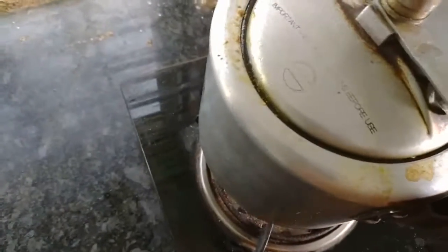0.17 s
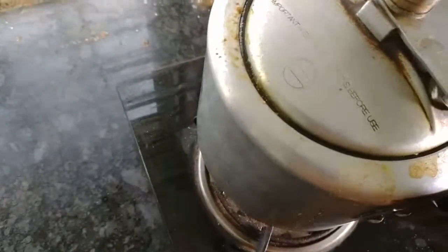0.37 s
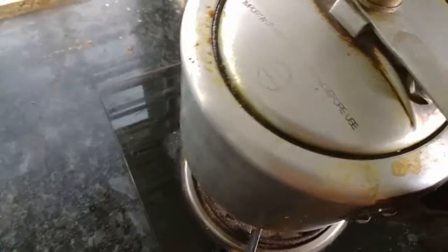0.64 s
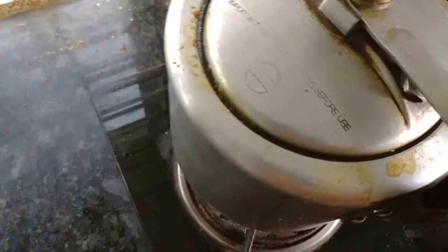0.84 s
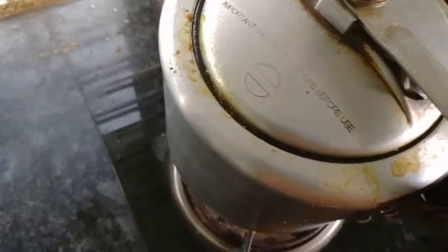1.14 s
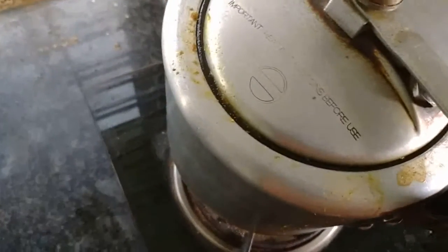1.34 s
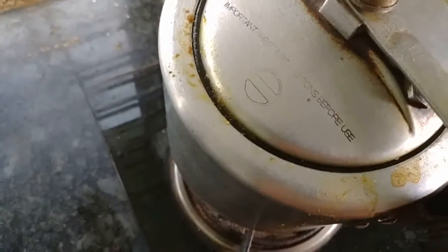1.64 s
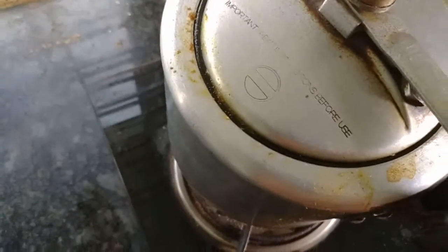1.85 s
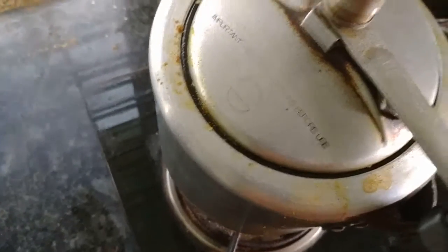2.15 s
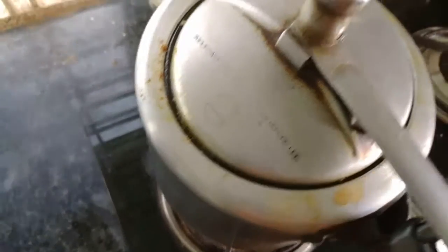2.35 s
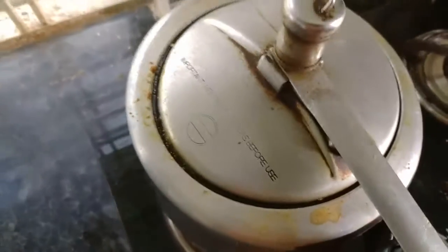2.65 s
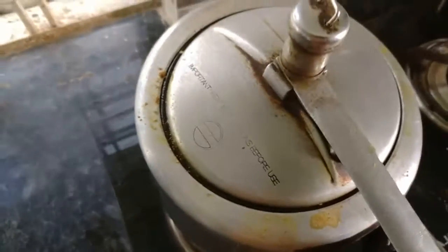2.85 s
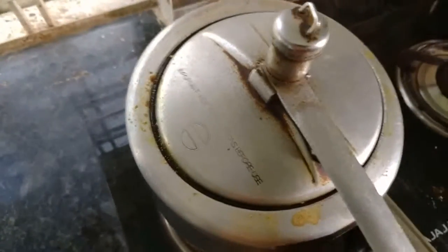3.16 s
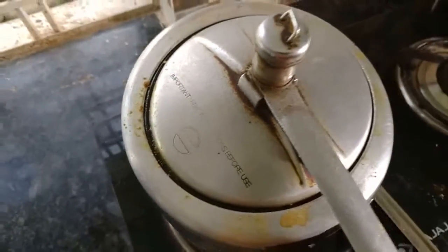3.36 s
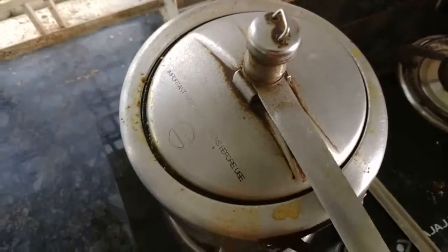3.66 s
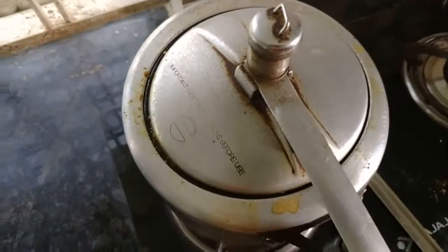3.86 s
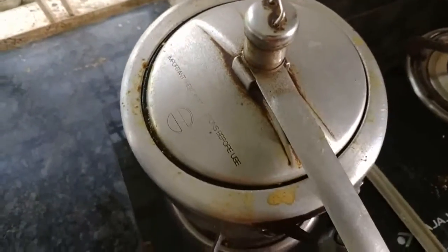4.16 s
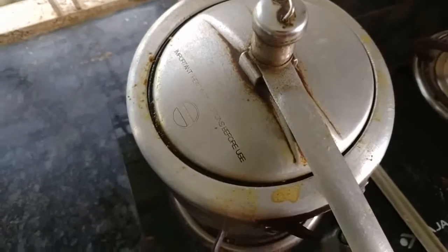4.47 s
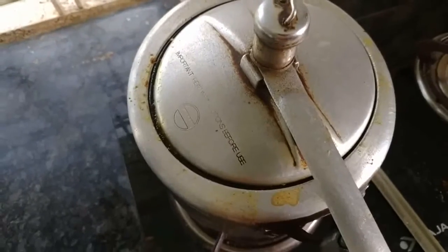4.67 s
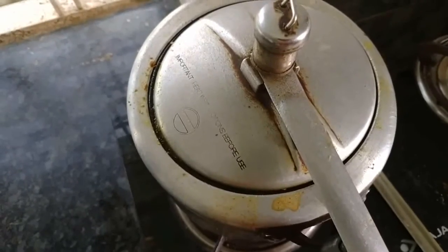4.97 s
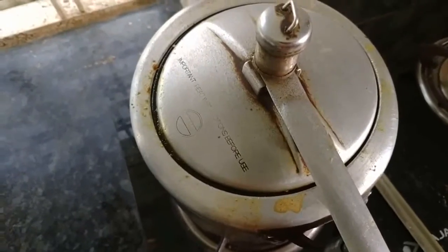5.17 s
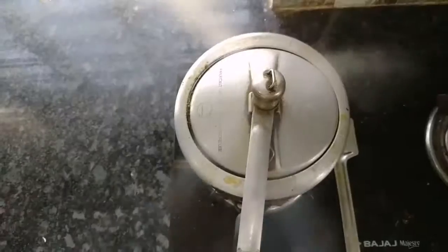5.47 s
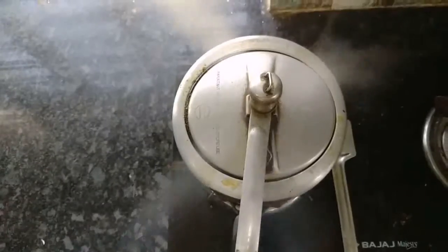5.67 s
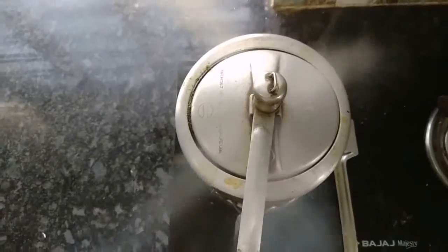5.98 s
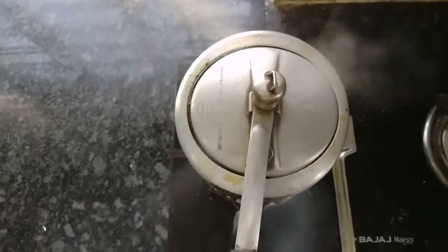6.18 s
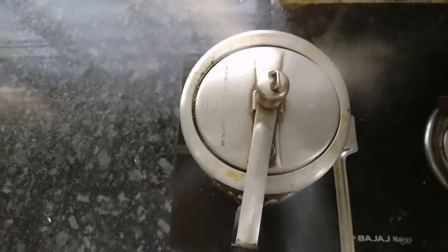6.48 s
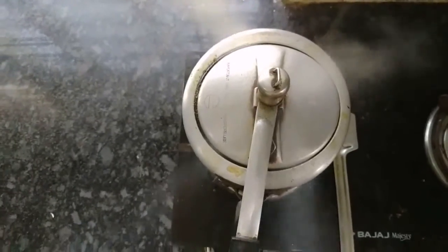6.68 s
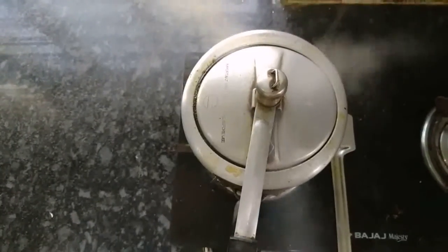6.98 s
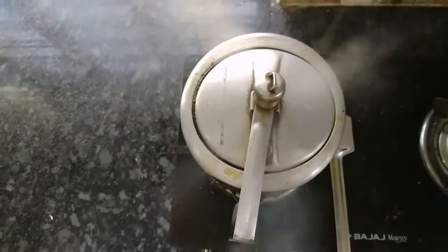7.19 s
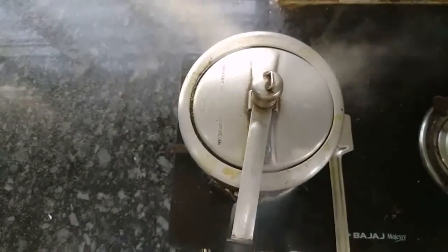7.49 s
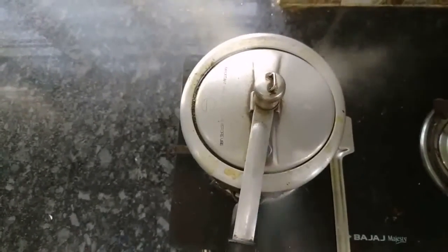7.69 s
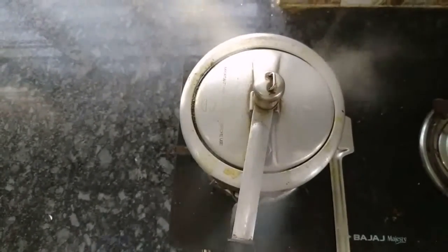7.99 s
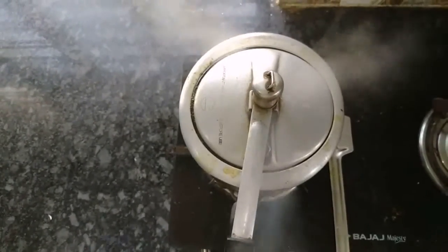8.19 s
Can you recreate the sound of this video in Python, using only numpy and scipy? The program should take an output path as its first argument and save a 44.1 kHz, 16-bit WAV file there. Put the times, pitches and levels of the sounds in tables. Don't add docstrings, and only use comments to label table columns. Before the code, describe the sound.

For the first five seconds a kitchen murmurs softly, with airy hiss, muffled low fan drones and a thin, pulsing hob whine near 10 kHz, stronger on the left. A faint husky falling bird whistle repeats about every 0.9 seconds from 0.15. Small scrapes come at the start, 0.7 and 1.0, a bright scratch at 2.35, a soft drag at 2.6 and a tiny one at 3.5. Sharp, dry counter knocks hit at 0.8, 1.75, 2.4 (brightest), 3.5 and, more softly, 3.7, with faint taps between. Thin metal jingles at 3.9-4.25, leaning left, with short room echo. A near-quiet second follows. At 5.27 the valve opens almost instantly: a loud, broad, bright steam hiss, strongest around 8-9 kHz, with draught buffeting on the left. It starts rougher, settles slightly as the phone pulls back, and continues steadily until cut at 8.3.

```python
import sys
import numpy as np
from scipy import signal
from scipy.fft import rfft, irfft, next_fast_len
from scipy.io import wavfile
from scipy.ndimage import uniform_filter1d

SR = 44100
rng = np.random.default_rng(int(sys.argv[2]) if len(sys.argv) > 2 else 0)


def gain_from_db(level_db):
    decades = np.asarray(level_db, float) / 20
    return 10 ** decades


def store_pcm(level_fs):
    pcm = np.round(np.clip(level_fs, -1, 1) * 32767).astype(np.int16)
    wavfile.write(sys.argv[1], SR, np.atleast_2d(pcm).T)


N = 367379

# pitch_hz, level_db (per Hz)
AIR_COLOUR = [(30, -40), (60, -13), (100, -7.5), (200, -4), (290, -7.5), (370, -2), (450, -6), (520, -1),
              (1050, -6), (2500, -10), (5500, -16), (9400, -20.5)]
# pitch_hz, level_db
AIR_TREBLE = [(9400, 0), (10550, 0), (10800, -32), (11800, -30), (12300, -21), (14200, -20), (14300, -30)]
# pitch_hz, likeness (-1 to 1)
AIR_LIKENESS = [(60, 0.81), (150, 0.96), (380, 0.8), (950, 0.036), (2380, 0.023), (5970, -0.15),
                (15000, 0.85)]
# pitch_hz, left_minus_right_db
AIR_LEAN = [(60, -8.5), (130, 8), (290, 11.5), (640, 1.5), (1410, 1), (3090, 0.5), (6810, -1), (15000, 46)]
# centre_s, rise_db, length_s
STIRRINGS = [(.14, 4, .12), (.9, 2, 0.22), (1.82, 8.5, 0.23), (2.54, 3, .1), (3.2, 2, 0.28),
             (3.72, 9.5, 0.29), (4.3, 3, 0.4), (5.1, 2.5, 0.36)]
# pitch_hz, width_hz, level_db
FAN_DRONES = [(111.8, 13, -69.5), (70.4, 14, -80), (368.4, 45, -71.5), (275.4, 34, -71.5)]
# multiple (times 100.02 Hz), level_db
WHINE_PARTIALS = [(98, -72), (99, -69), (99.5, -81), (100, -59), (100.5, -80), (101, -58.5), (102, -69),
                  (103, -79)]
# start_s, length_s, peak_db, brightness_db, peak_place (0 to 1)
SCRAPES = [
    (0.014, .13, -49, -5, .15),
    (1.001, 0.17, -66, -1, .5),
    (0.734, 0.044, -50.5, 2, 0.4),
    (2.35, 0.048, -41, 14, 0.24),
    (2.578, .18, -62, 4, 0.48),
    (3.472, .03, -49.5, 6, 0.8),
]
# pitch_hz, width_hz, level_db
HOLLOW_BODY = [(375, 33, -2), (522, 70, 3), (824, 110, -2.5), (1080, 390, -16), (2200, 1500, -28)]
# start_s, level_db, stretch (times)
BIRD_CALLS = [(.155, -75, 1), (1.01, -76, 1), (1.901, -74, 0.92), (2.86, -71.5, 0.9), (3.761, -72, 1),
              (4.66, -71.5, 1)]
# start_s, peak_db, left_minus_right_db, brightness_db
COUNTER_KNOCKS = [
    (0.768, -19.5, 3, 0.5),
    (0.949, -48, 1.5, 7),
    (1.322, -43, 2.0, 9),
    (1.749, -14.5, 0, 2),
    (2.027, -48, 0, -2),
    (2.074, -46, -2, -12),
    (2.391, -13, 1, 11.5),
    (3.253, -42, -3, -14),
    (3.506, -13, -1, 3.5),
    (3.666, -23.5, 4, 0),
]
# pitch_hz, level_db, fall_by_60_db_s
COUNTER_MODES = [(563, -20, .025), (1036, 7.5, 0.012), (1466, 0, 0.0086), (1945, -0.5, 0.011),
                 (2690, 2.5, 0.0061), (3660, 0.5, 0.018), (4300, -3.5, 0.0056), (6230, -8, 0.0044),
                 (7600, -8, 0.011), (9720, -12, 0.01)]
# start_s, peak_db, left_minus_right_db, thud_db, ring_db
METAL_TOUCHES = [(2.6394, -50, 13, 11, -6), (2.8604, -48, 3, 20, 0), (3.921, -31, 5.5, -4, 3),
                 (3.9303, -26, 11, -3, 0), (3.9361, -29.5, 8, 2, 8), (3.9516, -23, 6, 2, 2),
                 (3.961, -36, 3, 0, -5), (3.973, -43, 3, -2, -2), (4.0936, -36, 15, -2, -6),
                 (4.0965, -42, 9.0, -2, 0), (4.117, -33.5, 7, 3, 5.5), (4.2455, -33, 6, -4, -4)]
# pitch_hz, level_db, fall_by_60_db_s
METAL_MODES = [(2480, -14, .05), (4750, -18, .03), (6950, -18, .12), (7500, -8, .22), (8710, -8, .08),
               (9520, -4, .1), (10160, -4, .1), (11500, -12, .05), (13150, -6, .15), (14200, -2, .14)]
# pitch_hz, level_db (per Hz)
JET_COLOUR = [(60, -64), (110, -13), (300, -24.5), (700, -15.5), (1500, -13.5), (3200, -9), (4600, -7),
              (6400, -8), (7500, -6), (8500, 1), (9500, -3.5), (10700, -9.5), (12000, -8.5), (14000, -13.5)]
# pitch_hz, level_db
JET_LEFT_COLOUR = [(2000, 3.5), (5000, -0.5), (7000, -2.5), (8400, -5), (9700, 3), (11000, 3.5),
                   (14000, 3.5)]
# pitch_hz, likeness (-1 to 1)
JET_LIKENESS = [(60, -0.07), (150, -0.01), (380, -0.069), (950, -0.23), (2380, 0.059), (5970, 0.26),
                (15000, -0.054)]
# pitch_hz, level_db (per Hz)
BUFFET_COLOUR = [(30, -39), (60, -36), (110, 9), (200, -2), (380, -1), (700, -3), (1500, -7), (3000, -12.5),
                 (6000, -18)]
# time_s, level_db
DRAUGHT_LEVEL = [(5.29, -27), (6.1, -24), (6.8, -26), (7.5, -27), (8.33, -28)]
# pitch_hz, fall_by_60_db_s
ROOM_DECAY = [(250, 0.41), (700, 0.27), (2000, 0.24), (4000, 0.31), (8000, 0.38), (14000, 0.15)]
# pitch_hz, level_db
PORT_COLOUR = [(25, -28), (60, -0.5), (4680, 0.5), (4800, -3), (5100, -4), (5600, -2), (6100, -0.5)]
# pitch_hz, level_db
RIGHT_BASS_CUT = [(60, -29), (300, -23), (400, -13), (480, 1)]
# pitch_hz, level_db
TOP_EDGE = [(14230, 0), (14300, -18), (14430, -18), (14520, -50), (15500, -54), (15800, -80)]
# pitch_hz, level_db
SILENT_BELOW = [(1200, -30), (1900, -7), (3000, -3.5), (4600, -3), (4820, -4), (4880, -.5), (5060, -.5),
                (5200, -8), (6300, -6), (8000, -8), (11000, -12), (12500, -12.5), (13600, -11), (14250, -8),
                (14300, -60)]


def evened(x):
    return x / np.sqrt(np.mean(x ** 2) + 1e-20)


def read(points, hz):
    f, value = np.transpose(points)
    return np.interp(np.log(hz + 1), np.log(f + 1), value)


def sides(pan_db):
    return gain_from_db(np.array([[pan_db / 2], [-pan_db / 2]]))


def add(mix, start_s, sound):
    part = mix[:, round(start_s * SR):][:, :sound.shape[1]]
    part += sound[:, :part.shape[1]]


def drift(count, shape=()):
    coarse = signal.resample(rng.standard_normal((*shape, count)), 4096, axis=-1)
    place = np.linspace(0, 4095, N)
    return np.apply_along_axis(lambda v: np.interp(place, np.arange(4096), v), -1, coarse)


def resonate(x, hz, width):
    r = np.exp(-np.pi * width / SR)
    return 2 * signal.lfilter([1 - r], [1, -r * np.exp(2j * np.pi * hz / SR)], x).real


def noise(field_db, likeness, patchy_db, flicker_db, size=1024, skip=0):
    hop = size // 4
    hz = np.fft.rfftfreq(size, 1 / SR)[:, None]
    t = (skip + np.arange((N - skip) // hop + 5) * hop) / SR
    a, b, c, d, patches = rng.standard_normal((len(t), len(hz), 5)).T
    patches = uniform_filter1d(patches, size=size // 80, axis=0)
    patches = evened(uniform_filter1d(patches, size=8, axis=1))
    flicker = evened(uniform_filter1d(rng.standard_normal(len(t)), size=3))
    same = np.clip(read(likeness, hz), -1, 1)
    left = a + 1j * b
    right = same * left + np.sqrt(1 - same ** 2) * (c + 1j * d)
    level_db = field_db(hz, t) + patchy_db * patches + flicker_db * flicker
    z = np.array([left, right]) * gain_from_db(level_db)
    out = evened(signal.istft(z, nperseg=size, noverlap=size - hop)[1][:, :N - skip])
    return np.pad(out, ((0, 0), (skip, 0)))


def ring(modes, thin_db):
    t = np.arange(SR // 3) / SR
    out = np.zeros(len(t))
    for hz, db, t60 in modes:
        level_db = db + thin_db * (hz > 2000) - 60 * t / t60
        out += gain_from_db(level_db) * np.sin(2 * np.pi * hz * t)
    return out / abs(out).max()


def room(x):
    taps = np.zeros((2, SR // 2))
    at = np.arange(100, SR // 2 - 20, 20) + rng.integers(0, 20, (2, (SR // 2 - 101) // 20))
    np.put_along_axis(taps, at, rng.choice([-1., 1.], at.shape), 1)
    hz, t, z = signal.stft(taps, SR, nperseg=256)
    dying = gain_from_db(-60 * t / read(ROOM_DECAY, hz)[:, None])
    tail = signal.istft(z * dying, SR, nperseg=256)[1]
    return signal.fftconvolve(x, tail / np.linalg.norm(tail[0]), axes=1)[:, :N]


def air():
    murmur_db, hiss_db, hiss_follows = -1.5, -1.3, 0.32

    def field_db(hz, t):
        stir_db = sum(db * np.exp(-((t - s) / length) ** 2) for s, db, length in STIRRINGS)
        low = np.clip(np.log2(1400 / (hz + 1)), 0, 1) * np.clip(np.log2(hz / 150 + 1e-9), 0, 1)
        lean_db = read(AIR_LEAN, hz) / 2
        shape_db = read(AIR_COLOUR, hz) + read(AIR_TREBLE, hz)
        shape_db = shape_db + low * (murmur_db + stir_db)
        shape_db = shape_db + (hz > 1400) * (hiss_db + hiss_follows * stir_db)
        return shape_db + np.array([lean_db, -lean_db - read(RIGHT_BASS_CUT, hz)])

    wash = gain_from_db(-57 + 3.0) * evened(noise(field_db, AIR_LIKENESS, patchy_db=1.5, flicker_db=0.4))
    drones = np.zeros(N)
    for hz, width, db in FAN_DRONES:
        fuzz = resonate(rng.standard_normal(N), hz, width)
        drones += gain_from_db(db) * evened(resonate(fuzz, hz, width))
    return wash + drones * gain_from_db([[4], [3]])


def whine():
    mains_beat_hz, level_db, pan_db = 100.02, -59, 11
    fade_db, slip_rad = 2.6, 1.0
    t, out = np.arange(N) / SR, np.zeros((2, N))
    for multiple, db in WHINE_PARTIALS:
        fade, slip = drift(count=18, shape=(2, 2))
        tone = np.sin(2 * np.pi * multiple * mains_beat_hz * t + slip_rad * slip)
        out += gain_from_db(db - fade_db * fade ** 2) * tone
    return evened(out) * gain_from_db(level_db) * sides(pan_db)


def scuffs():
    ends_db, flatness = -26, 2.4
    out = np.zeros((2, N))
    for start, length, peak_db, bright_db, place in SCRAPES:
        t = np.arange(start, start + length, 1 / SR)
        away = np.interp(t - start, [0, np.clip(place, .05, .99) * length, length], [1, 0, 1])
        db = peak_db + ends_db * away ** flatness
        grip = evened(uniform_filter1d(rng.standard_normal(len(t)), size=200))
        rub = rng.standard_normal(len(t)) * gain_from_db(2.8 * grip)
        damping = np.clip(gain_from_db(bright_db + 6.0), 1, 5)
        body = np.zeros(len(t))
        for hz, width, level_db in HOLLOW_BODY:
            damped_hz = min(1.5 * damping * width, hz)
            hollow = resonate(resonate(rub, hz, damped_hz), hz, damped_hz)
            body += gain_from_db(level_db + bright_db * (hz > 1000)) * evened(hollow)
        sound = gain_from_db(db) * evened(body) * signal.windows.tukey(len(t), .1)
        add(out, t[0], sound * gain_from_db([[3], [1]]))
    return out + gain_from_db(-2) * room(out)


def bird():
    call_s, top_hz, fall_oct_per_s = .21, 5770, 5.8
    peak_db, ends_db, flatness = 1, -26, 3.4
    out = np.zeros((2, N))
    for s, db, stretch in BIRD_CALLS:
        t = np.arange(0, call_s, 1 / SR / stretch)
        hz = top_hz * 2 ** (-fall_oct_per_s * t)
        shape_db = peak_db + ends_db * abs(2 * (t / call_s) ** 1.25 - 1) ** flatness
        flutter, wobble = signal.resample(rng.standard_normal((2, 36)), len(t), axis=1)
        loudness = gain_from_db(db + shape_db + 7.1 * np.tanh(flutter))
        whistle = loudness * np.sin(2 * np.pi * np.cumsum(hz * (1 + 0.0177 * wobble)) / SR)
        add(out, s, whistle * signal.windows.tukey(len(t), .2) * gain_from_db([[2], [3]]))
    return out + gain_from_db(1) * room(out)


def knocks():
    bounce_s, bounce_s_per_db = .0025, .000015
    near, far = np.zeros((2, 2, N))
    for s, db, pan_db, bright_db in COUNTER_KNOCKS:
        contacts = rng.standard_normal((2, 500)) * (rng.random(500) < .15)
        blow = .55 * contacts * np.exp(-np.arange(500) / 160)
        blow[:, 0] += 1
        blow[:, int(np.clip((bounce_s + bounce_s_per_db * db) * SR, 1, 499))] += .9
        spot = [(hz * rng.uniform(.96, 1.04), level_db + 2 * rng.standard_normal(), t60)
                for hz, level_db, t60 in COUNTER_MODES]
        body = ring(spot, bright_db)
        body[:3] += [.3, -.18, -.12]
        sound = signal.fftconvolve(blow, body[None], axes=1)
        sound = gain_from_db(db) * sides(pan_db) * sound / abs(sound).max()
        add(near, s + 0.00078, sound)
        add(far, s + .0008, gain_from_db(-3) * sound * np.exp(-np.arange(sound.shape[1]) / 70))
    no_rumble = signal.butter(N=3, Wn=260, btype="high", fs=SR, output="sos")
    return signal.sosfilt(no_rumble, near + room(far))


def jingles():
    out, t = np.zeros((2, N)), np.arange(SR // 3) / SR
    bright = signal.butter(N=2, Wn=[7800, 15500], btype="band", fs=SR, output="sos")
    for s, db, pan_db, thud_db, ring_db in METAL_TOUCHES:
        dull_db = 1.3 * max(thud_db, 0)
        touch = []
        for hz, level_db, t60 in METAL_MODES:
            weight_db = min(thud_db, 6) * (hz < 5000) - dull_db * (hz > 8000)
            touch.append((hz, level_db + weight_db + 4 * rng.standard_normal(), t60))
        tick = 1.5 * min(gain_from_db(0.55 * (db + 27)), 1) * np.exp(-t / 0.00083)
        fizz = signal.sosfilt(bright, rng.standard_normal((2, len(t))))
        fizz = fizz * (tick + 0.2 * np.exp(-t / 0.004))
        sound = gain_from_db(ring_db - 5.5) * ring(touch, 0) + gain_from_db(-dull_db) * fizz
        add(out, s, gain_from_db(db) * sides(pan_db) * sound)
    return out + gain_from_db(-3.5) * room(out)


def steam():
    lift_s, rise_s, leak_db = 5.2745, 0.0026, -30
    back_off_s = 0.72
    jet_db, jet_near_db = -15, -1.2
    treble_pan_db, treble_pan_near_db = -0.24, -2.5
    reach_db, reach_near_db = -4.5, 8.5
    t, shut = np.arange(N) / SR, 5 * SR
    gust_db = 1.37 * drift(count=150)

    def near(s):
        return np.exp(-np.maximum(s - lift_s, 0) / back_off_s)

    def jet_field_db(hz, s):
        high = np.clip(np.log2(hz / 4000 + 1e-9), 0, 1)
        treble_db = (treble_pan_db + treble_pan_near_db * near(s)) * high
        left_db = read(JET_LEFT_COLOUR, hz) + 1.6 * treble_db
        return read(JET_COLOUR, hz) + np.array([left_db, -.3 * treble_db])

    mids_db = reach_db + reach_near_db * near(t) - 1.7 * gust_db

    def buffet_field_db(hz, s):
        mids = np.clip(np.log2(hz / 350 + 1e-9), 0, 1)
        return read(BUFFET_COLOUR, hz) + np.interp(s, t, mids_db) * mids

    jet = noise(jet_field_db, JET_LIKENESS, patchy_db=0.98, flicker_db=-0.27, size=512, skip=shut)
    buffet = noise(buffet_field_db, [(100, 0)], patchy_db=1.5, flicker_db=0.1, size=512, skip=shut)
    draught_s, draught_db = np.transpose(DRAUGHT_LEVEL)
    buffet_db = np.interp(t, draught_s, draught_db) + gust_db
    both = gain_from_db(jet_db + jet_near_db * near(t) + 3.5) * jet
    both = both + gain_from_db(buffet_db + 10) * buffet * gain_from_db([[0], [-30]])
    opening = np.clip((t - lift_s) / rise_s, 0, 1)
    leak = gain_from_db(leak_db) * np.clip((t - lift_s + 0.0052) / 0.0069, 0, 1) ** 2
    return both * np.maximum(opening, leak)


def scene():
    return air() + whine() + scuffs() + bird() + knocks() + jingles() + steam()


def blanked(x):
    hz, _, z = signal.stft(x, SR, nperseg=1024, noverlap=768)
    power = uniform_filter1d((abs(z) ** 2).mean(0), size=4, axis=0)
    power = uniform_filter1d(power, size=8, axis=1)
    mean_db = 10 * np.log10(power[(hz > 4000) & (hz < 14000)].mean(0) + 1e-20)
    limit_db = read(SILENT_BELOW, hz)[:, None] + mean_db + .29 * (mean_db + 38)
    limit_db = limit_db + .7 * signal.resample(rng.standard_normal(90), len(mean_db))
    chance = rng.standard_normal(np.array(power.shape) // 4 + 1)
    chance = evened(uniform_filter1d(chance, size=3, axis=1))
    chance = np.kron(chance, np.ones((4, 4)))[:len(hz), :len(mean_db)]
    limit_db = limit_db - 1.5 + 3.8 * chance
    under_db = limit_db - 10 * np.log10(power + 1e-20)
    keep = 1 / (1 + gain_from_db(np.clip(30 * under_db, -99, 50)))
    return signal.istft(z * keep, SR, nperseg=1024, noverlap=768)[1][:, :N]


def roll_off(x):
    return signal.sosfilt(signal.butter(12, 15580, fs=SR, output="sos"), x)


def record(dry):
    size = next_fast_len(N + SR // 2)
    hz = np.fft.rfftfreq(size, 1 / SR)
    colour_db = read(PORT_COLOUR, hz) + np.array([0 * hz, read(RIGHT_BASS_CUT, hz)])
    heard = irfft(rfft(dry, size) * gain_from_db(colour_db), size)
    over = np.maximum(abs(heard) - .6, 0)
    limited = heard - np.sign(heard) * (over - .3 * np.tanh(over / .3))
    edged = irfft(rfft(limited) * gain_from_db(read(TOP_EDGE, hz)), size)[:, :N]
    return roll_off(blanked(edged))


dry = scene()
out = record(dry)
store_pcm(out)
```